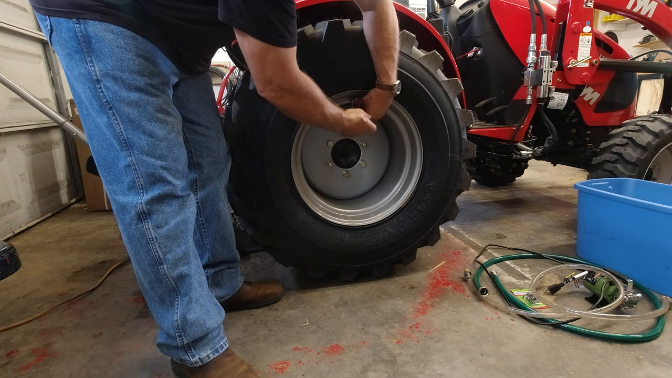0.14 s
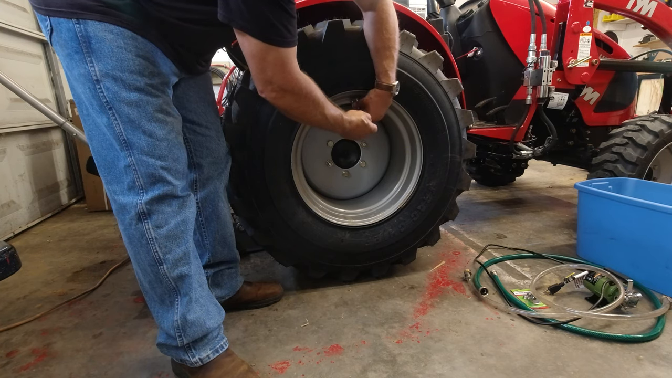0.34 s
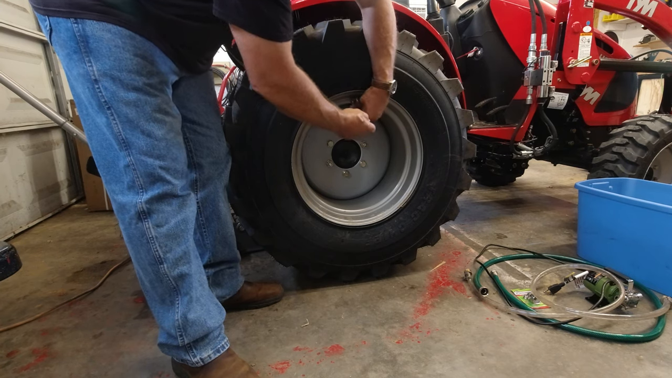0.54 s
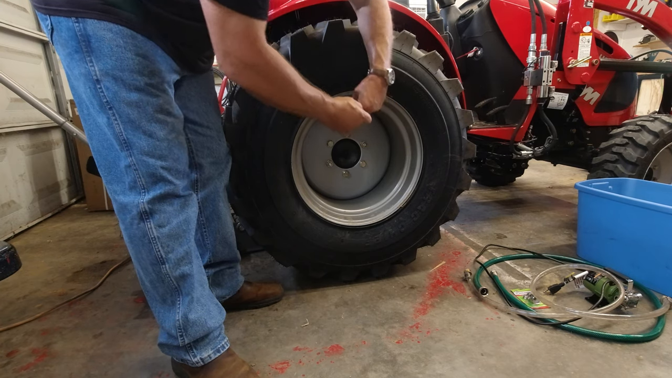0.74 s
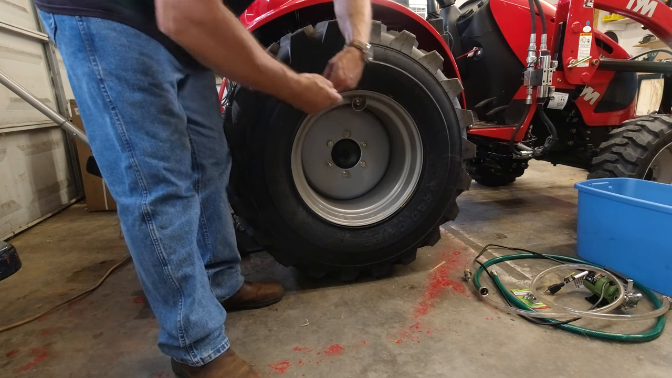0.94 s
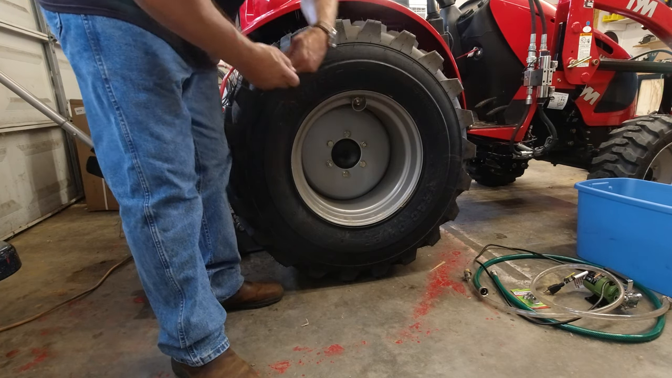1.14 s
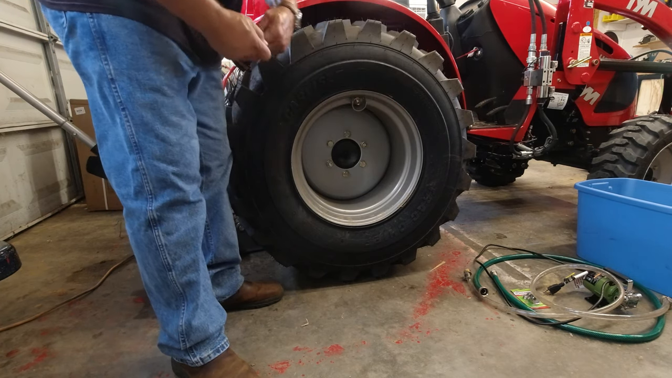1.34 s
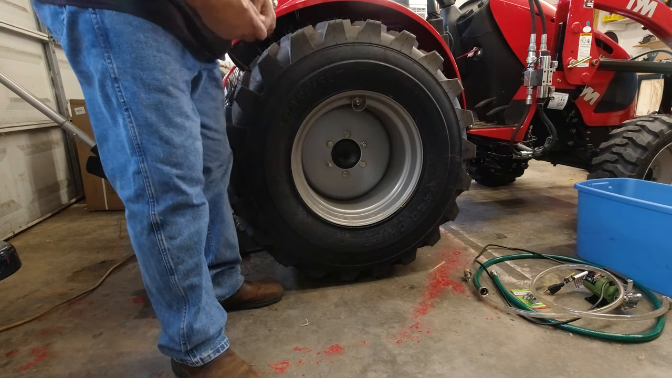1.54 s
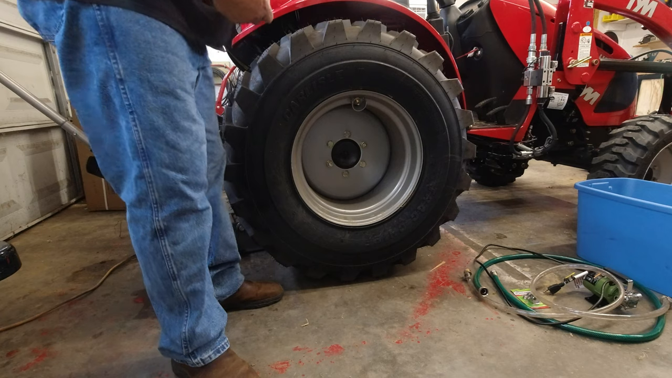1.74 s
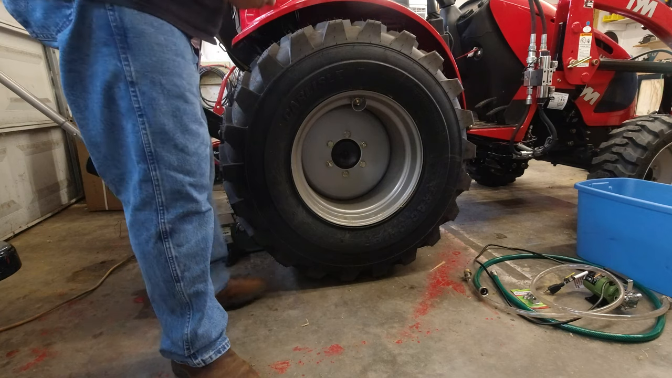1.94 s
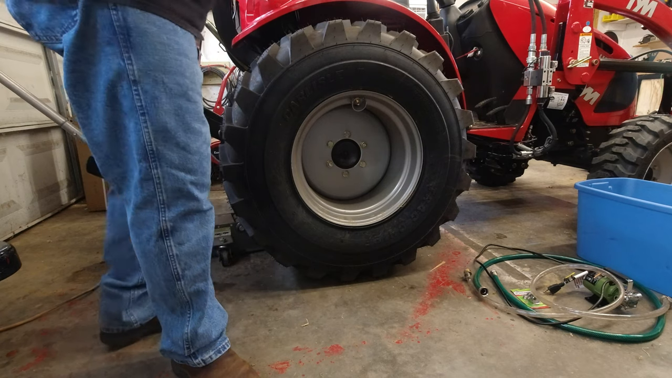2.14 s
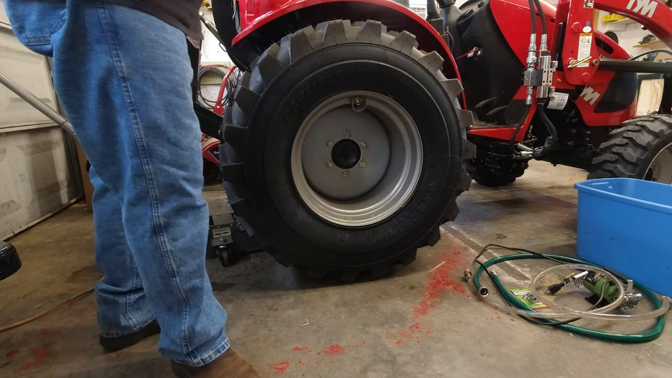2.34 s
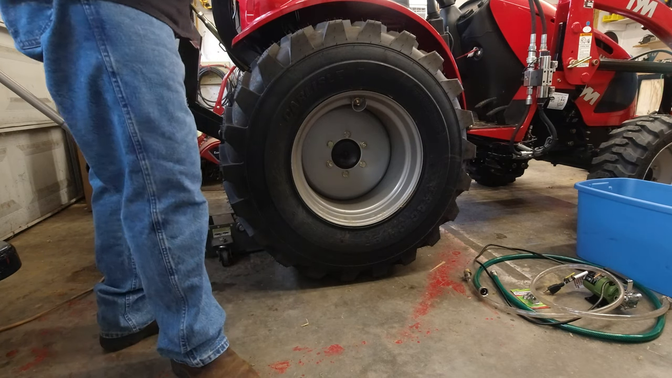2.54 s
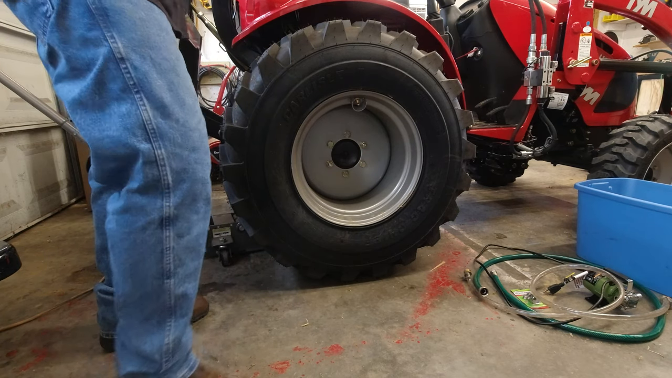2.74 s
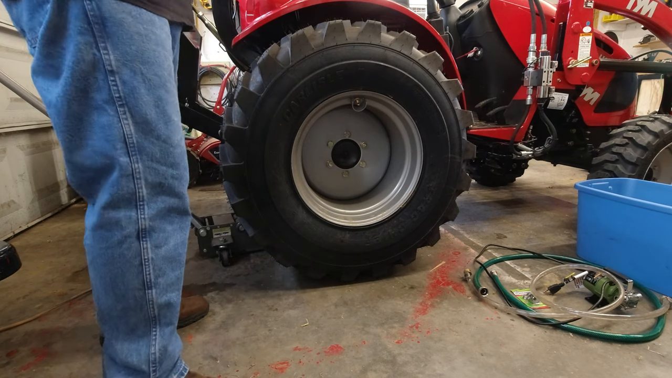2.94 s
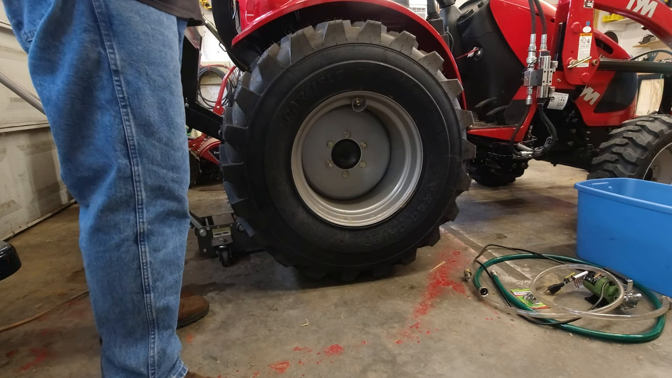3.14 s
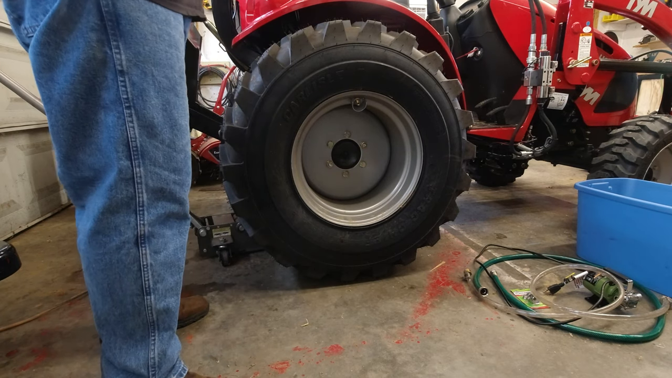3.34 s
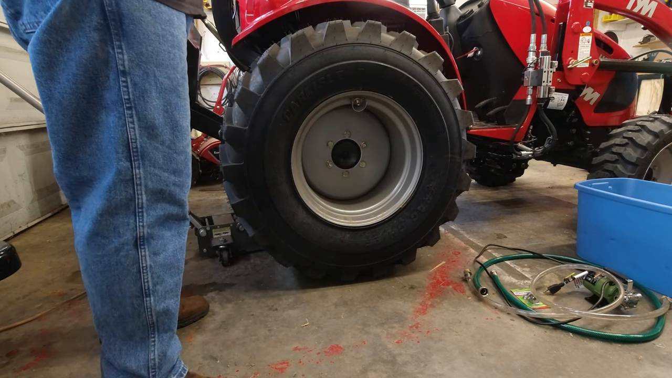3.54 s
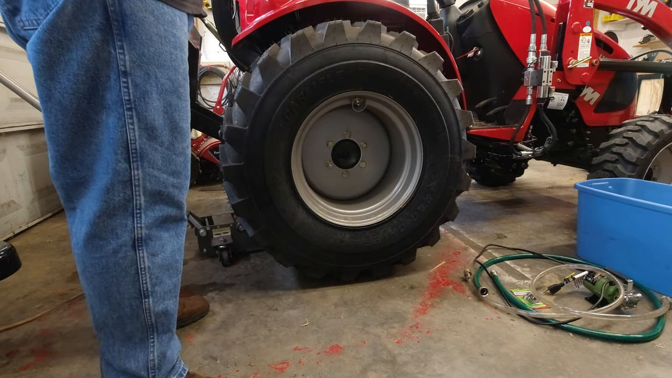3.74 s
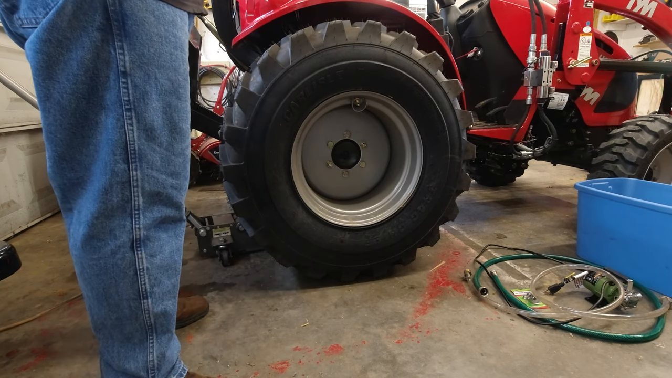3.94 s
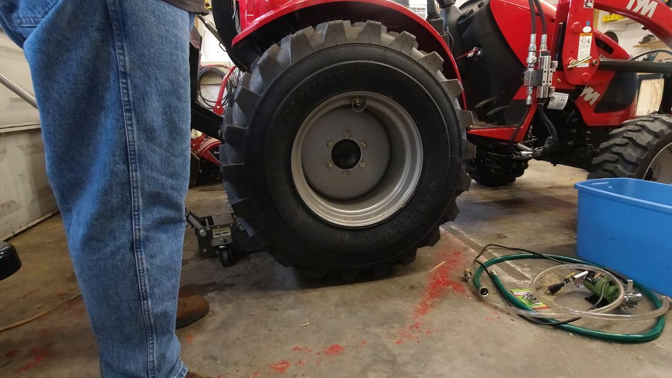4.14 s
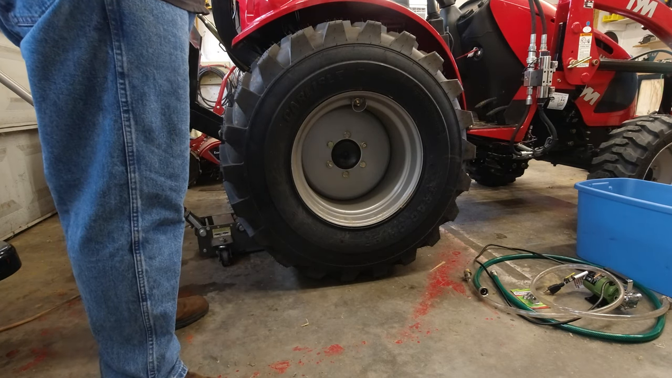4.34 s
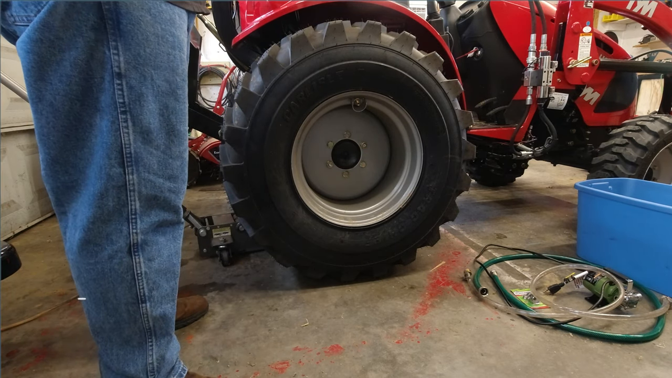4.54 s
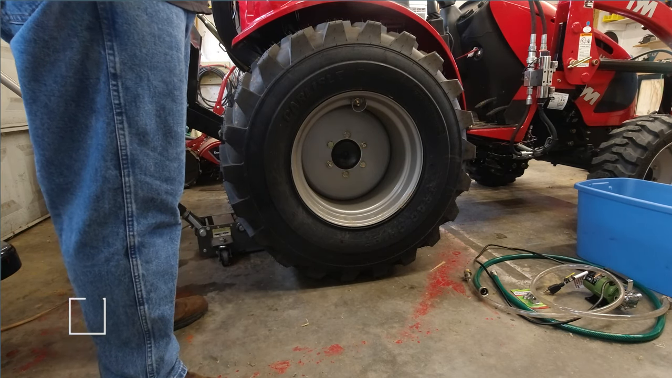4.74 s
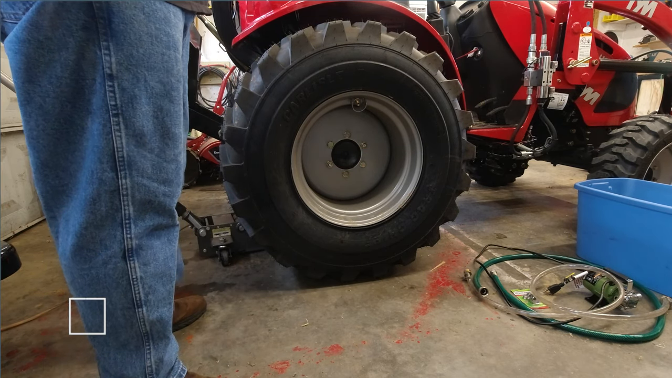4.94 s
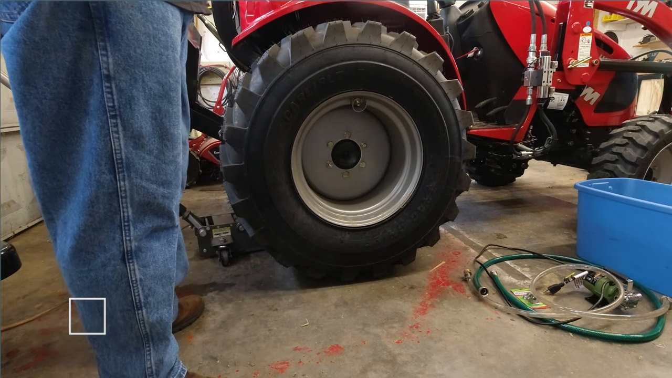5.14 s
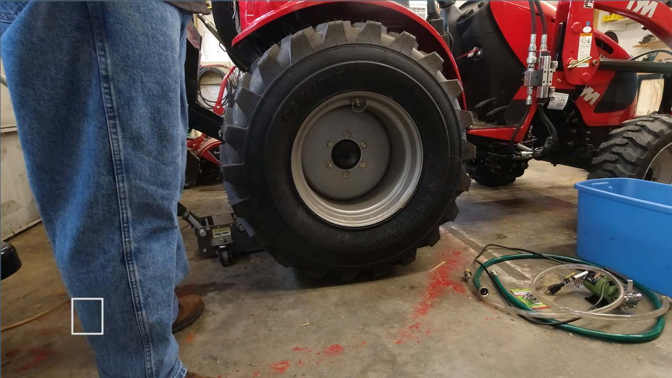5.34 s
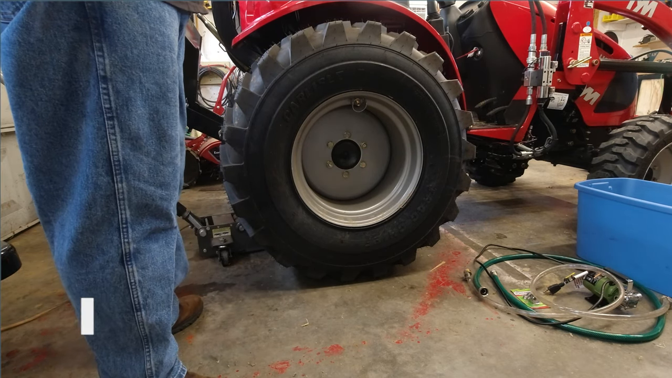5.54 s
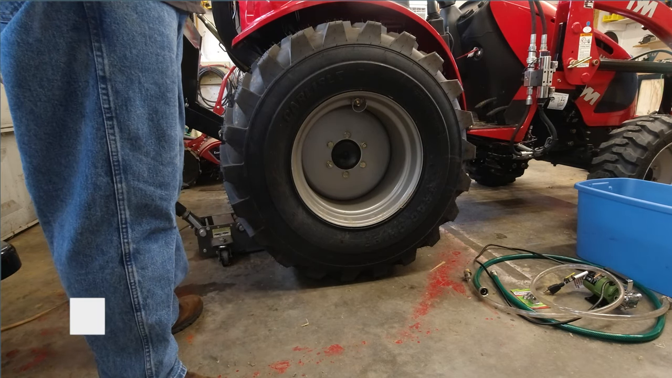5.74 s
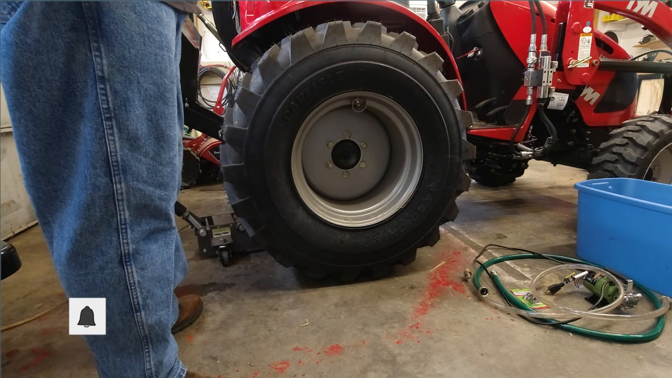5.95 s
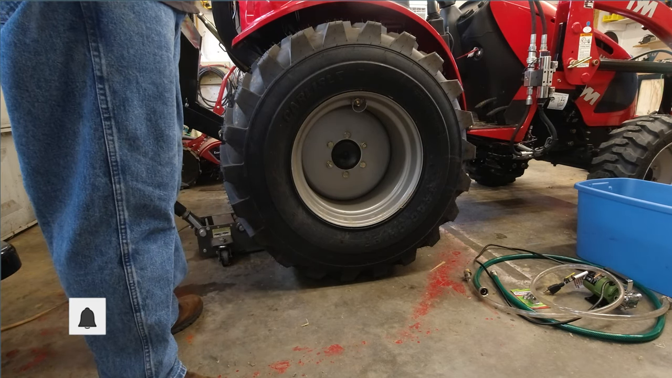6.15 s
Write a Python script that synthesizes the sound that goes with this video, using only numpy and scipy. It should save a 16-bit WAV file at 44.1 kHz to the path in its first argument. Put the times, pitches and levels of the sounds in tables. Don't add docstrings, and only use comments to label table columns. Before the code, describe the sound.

Close by a large tractor wheel, a thin hiss suddenly bursts into strong rushing air that holds for seconds and gradually sags.

```python
import sys
import numpy as np
from scipy import signal
from scipy.fft import rfft, irfft
from scipy.io import wavfile
from scipy.ndimage import uniform_filter1d

SR = 44100
rng = np.random.default_rng(int(sys.argv[2]) if len(sys.argv) > 2 else 0)


def magnitude_from_level(level_db):
    exponent = np.asarray(level_db, float) / 20
    return 10 ** exponent


def digitize_waveform(pressure):
    field = np.atleast_2d(pressure).T
    bounded = np.clip(field, -1, 1)
    quanta = np.round(bounded * 32767).astype(np.int16)
    wavfile.write(sys.argv[1], SR, quanta)


N = 277592
LEAD = 8192
FREE_DISH_DB, FREE_SHADE_DB = 0.57, -3.5


def evened(x):
    return x / np.sqrt(np.mean(x ** 2) + 1e-20)


def read(points, hz):
    f, value = np.transpose(points)
    return np.interp(np.log(hz + 1), np.log(f + 1), value)


def colour(x, gain_db):
    size = x.shape[-1]
    hz = np.fft.rfftfreq(size, 1 / SR)
    return irfft(rfft(x) * magnitude_from_level(gain_db(hz)), size)


def resonances(peaks, hz):
    return sum(db / (1 + (2 * (hz - centre) / width) ** 2) for centre, width, db in peaks)


def fall_below(corner_hz, hz):
    return np.maximum(np.log2(corner_hz / (hz + 1)), 0)


def slow(shape, size):
    chance = rng.standard_normal(shape)
    return evened(uniform_filter1d(uniform_filter1d(chance, size), size))


def control(t):
    # (start [s], glide [s], jet level [dB], wheel dish boost [dB], hand shade [dB])
    stages = [
        (0, .01, -57, 9, 3),
        (.266, .007, -45, 3, -2),
        (.31, 0.053, -46, 9, 3.2),
        (.390, 0.014, -31, -.5, -2),
        (.45, 0.045, -30.6, -2, -3),
        (.735, 0.034, -31, 3.5, 0.5),
        (.89, 0.1, -30.5, 0.4, -3.5),
    ]
    start, glide, *held = np.transpose(stages)
    reached = np.clip((t - start[1:, None]) / glide[1:, None], 0, 1)
    jet_db, dish_db, shade_db = (h[0] + np.diff(h) @ reached for h in held)
    free_jet_db = held[0][-1]
    wash_db = -40.5 + 1.58 * (jet_db - free_jet_db) + 0.77 * (shade_db - FREE_SHADE_DB)
    sag_db = -3.5 * (np.maximum(t, 0) / 6.38) ** 4.8
    puff_s, puff_fade_s = 0.377, 0.026
    puff_db = 6 * (t > puff_s) * np.exp(-abs(t - puff_s) / puff_fade_s)
    wash_sag_db = sag_db - 0.76 * t
    return jet_db + sag_db, dish_db, shade_db, wash_db + wash_sag_db + puff_db


def core(hz):
    # (frequency [Hz], width [Hz], level [dB])
    stem_peaks = [(2050, 150, 1.5), (2750, 460, 3), (3850, 400, -1), (4600, 350, 3), (6300, 1500, -1.5)]
    return resonances(stem_peaks, hz)


def jet():
    # (frequency [Hz], density [dB per Hz])
    jet_spectrum = [(530, -20), (900, -22), (1270, -10.5), (1820, -3.5), (2310, -5), (2630, -2),
                    (2860, -3.5), (3180, 0), (3500, -1.5), (3890, 1.5), (6650, -9), (7960, -9.5),
                    (10200, -2), (15500, -10.5)]
    # (frequency [Hz], width [Hz], level [dB])
    rim_peaks = [(1870, 200, 0), (2493, 65, 3), (2700, 36, 6.5), (3260, 140, 2), (3775, 310, 3),
                 (4574, 86, 4.5), (8330, 95, 2.5), (9400, 180, 0), (10000, 70, -0.5), (10900, 300, 0)]
    # (frequency [Hz], share [1])
    dish_share = [(2000, 0.21), (2900, 0.93), (4700, 0.92), (5200, 0.43), (5600, 0.25), (7500, 0.3),
                  (10000, 0.)]
    # (frequency [Hz], share [1])
    shade_share = [(700, 0.56), (1400, 1.4), (2200, 0.91), (3000, 0.041)]
    # (frequency [Hz], level [dB])
    scatter_spectrum = [(1000, -14), (2000, -3), (3300, -6.5), (6000, -6.5), (7800, -4), (9800, -4.5),
                        (11500, -9.5), (13000, -6), (15500, -8)]
    core_out_s = 0.395

    noise = rng.standard_normal((2, N + LEAD))
    hz, t, z = signal.stft(noise, SR, nperseg=256, noverlap=192)
    t = t - LEAD / SR
    jet_db, dish_db, shade_db, _ = control(t)
    field_db = jet_db + np.outer(read(dish_share, hz), dish_db - FREE_DISH_DB)
    field_db += np.outer(read(shade_share, hz), shade_db - FREE_SHADE_DB)
    field_db += np.outer(core(hz), t < core_out_s)

    eddies = evened(uniform_filter1d(slow(z.shape[1:], size=40), size=4, axis=0))
    glints = evened(uniform_filter1d(slow(z.shape[1:], size=30), size=8, axis=0))
    swell = slow(len(t), size=50)
    flicker = slow(len(t), size=5)
    field_db += 0.5 * eddies + 0.16 * swell + 0.33 * flicker
    glint_db = 4.0 * glints * np.clip(hz / 4200.0, 0, 1)[:, None]
    z[1] *= magnitude_from_level(read(scatter_spectrum, hz)[:, None] + glint_db)
    hiss = signal.istft(z * magnitude_from_level(field_db), SR, nperseg=256, noverlap=192)[1][:, :N + LEAD]

    def fixed_db(f):
        low_cut_db = -24.0 * fall_below(620.0, f)
        return read(jet_spectrum, f) + resonances(rim_peaks, f) + low_cut_db + 8.24

    return colour(hiss, fixed_db)


def garage(x):
    # (left delay [ms], right delay [ms], level [dB])
    reflections = [(.9, 0.975, -20.5), (2.3, 2.1, -20.5), (3.6, 8.2, -34), (5.7, 6.2, -16.5),
                   (8.2, 11, -21)]
    # (frequency [Hz], t60 [s])
    decay_times = [(500, 1), (4000, 0.52), (15000, 0.39)]
    length, spacing = SR // 2, 20
    taps = np.zeros((2, length))
    slots = np.arange(400, length - spacing, spacing)
    at = slots + rng.integers(0, spacing, (2, len(slots)))
    np.put_along_axis(taps, at, rng.choice([-1., 1.], at.shape), 1)
    hz, t, z = signal.stft(taps, SR, nperseg=256)
    decay_db = -60 * t / read(decay_times, hz)[:, None]
    tail = signal.istft(z * magnitude_from_level(decay_db), SR, nperseg=256)[1]
    response = magnitude_from_level(-17) * tail / np.linalg.norm(tail[0])
    response[:, 0] += 1
    n = np.arange(512)
    for *ms, db in reflections:
        delay = np.array(ms)[:, None] * SR / 1000
        response[:, :512] += magnitude_from_level(db) * np.sinc(n - delay)
    return signal.fftconvolve(x[None], response, axes=1)[:, LEAD:LEAD + N]


def hum():
    # (frequency [Hz], density [dB per Hz])
    air_spectrum = [(18, -30), (30, -5), (118, -9), (183, -14), (338, -8), (447, -20), (668, -5),
                    (1200, -10), (1560, -33), (2640, -120)]

    def air_db(f):
        return read(air_spectrum, f) - 12.0 * np.maximum(np.log2((f + 1) / 1400.0), 0)

    shared, apart = colour(rng.standard_normal((2, N)), air_db)
    air = evened(np.array([shared + 0.16 * apart, shared - 0.13 * apart]))
    self_noise = magnitude_from_level(-75) * rng.standard_normal((2, N))
    return magnitude_from_level(-68.5) * air + self_noise


def port_wash():
    # (frequency [Hz], density [dB per Hz])
    wash_spectrum = [(20, -5.5), (40, -9.5), (110, -0.5), (300, 1), (1000, 2), (2500, 2.5), (5000, -7),
                     (16000, -9.5)]
    wash_db = control(np.arange(N) / SR)[3]
    open_valve = 1 / (1 + magnitude_from_level(-2 * (wash_db + 62)))
    lumps_db = 1.0 * slow((2, N), size=300) + 0.78 * slow(N, size=3000)
    noise = evened(colour(rng.standard_normal((2, N)), lambda f: read(wash_spectrum, f)))
    return noise * open_valve * magnitude_from_level(wash_db + lumps_db + 8.5)


def scene():
    straight, scattered = jet()
    sides = np.outer([1, -1], scattered[LEAD:])
    return garage(straight) + sides + port_wash() + hum()


def band_limit(x):
    return signal.sosfilt(signal.butter(12, 17070, fs=SR, output="sos"), x)


def record(dry):
    lowpass = signal.firwin(1023, 15730, window=("kaiser", 9), fs=SR)
    limited = signal.oaconvolve(dry, lowpass[None], "same")
    return band_limit(limited)


dry = scene()
out = record(dry)
digitize_waveform(out)
```